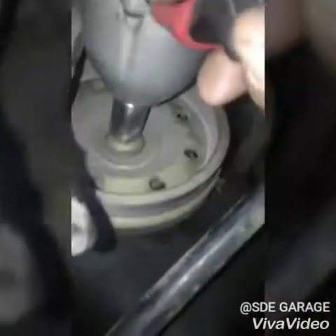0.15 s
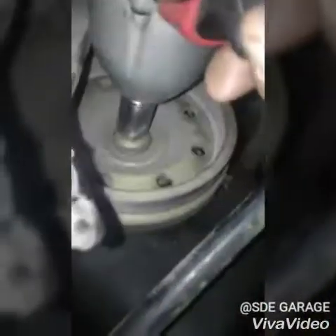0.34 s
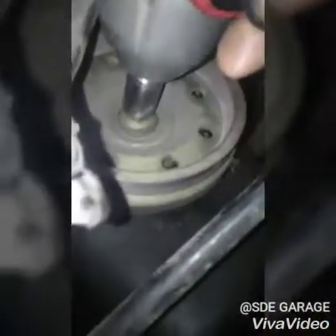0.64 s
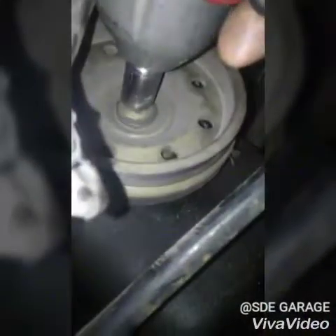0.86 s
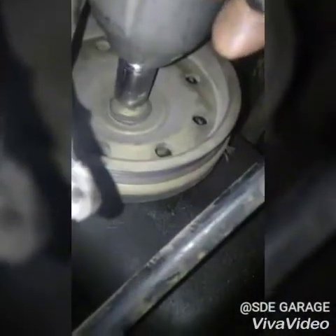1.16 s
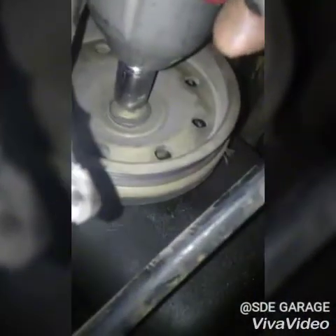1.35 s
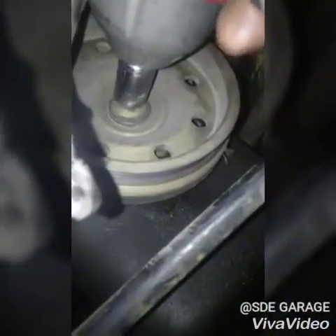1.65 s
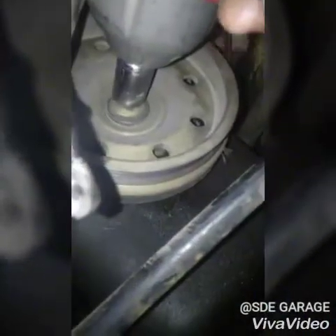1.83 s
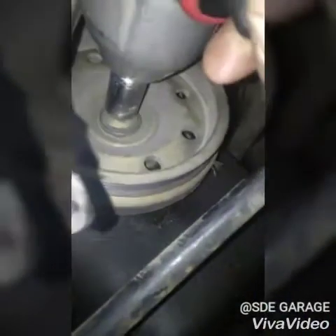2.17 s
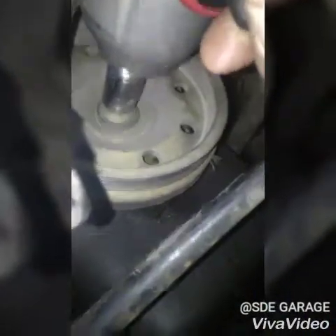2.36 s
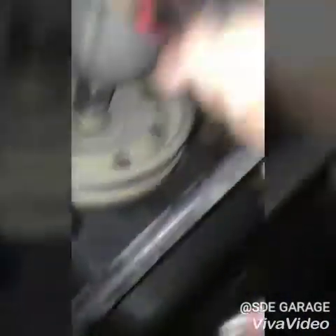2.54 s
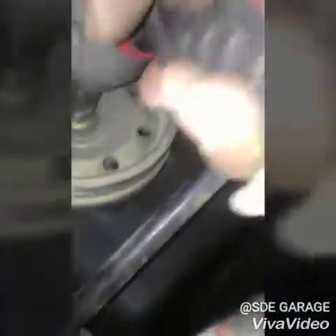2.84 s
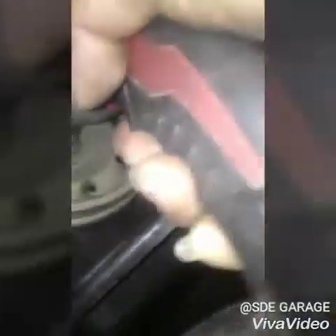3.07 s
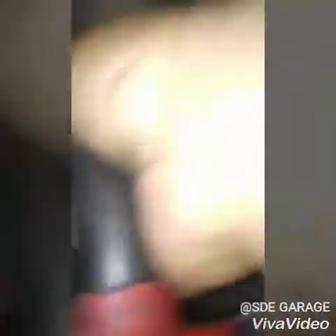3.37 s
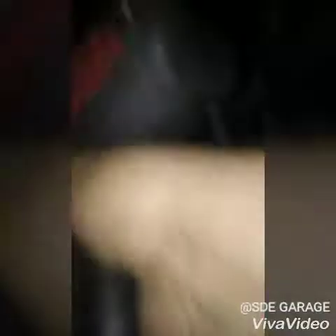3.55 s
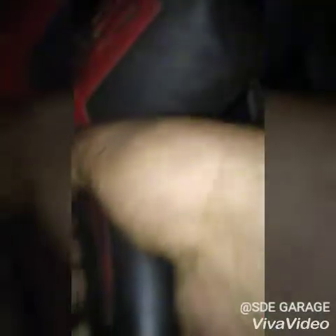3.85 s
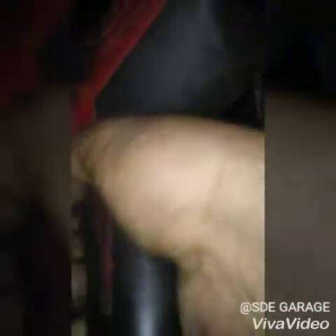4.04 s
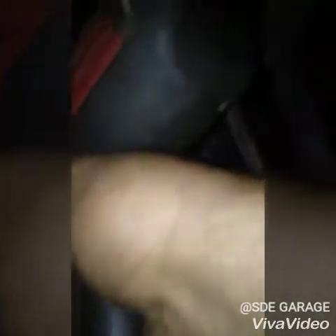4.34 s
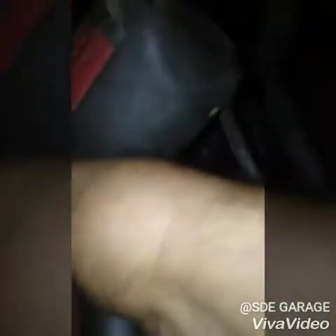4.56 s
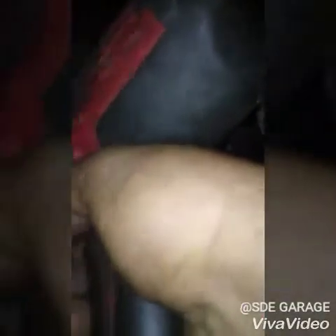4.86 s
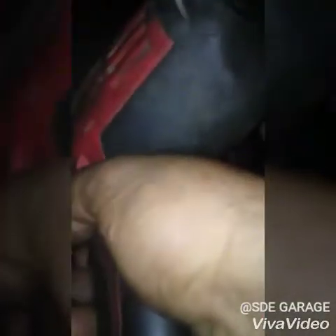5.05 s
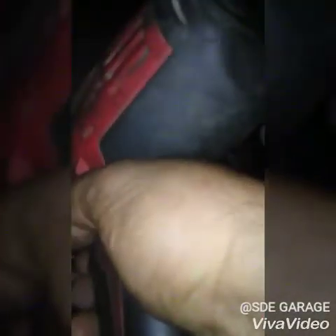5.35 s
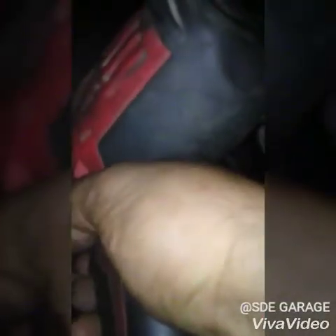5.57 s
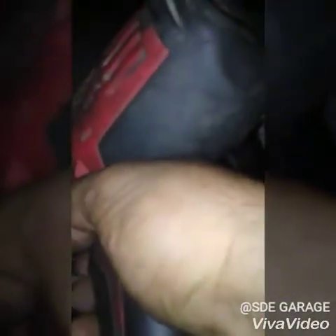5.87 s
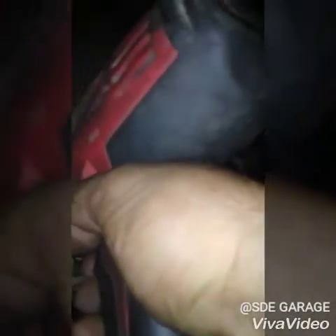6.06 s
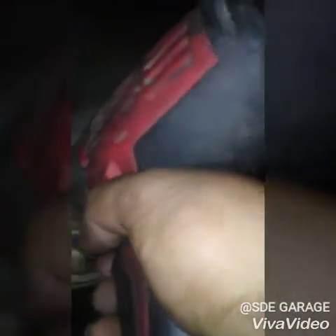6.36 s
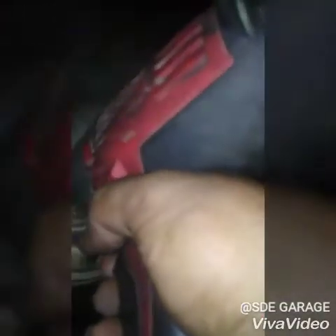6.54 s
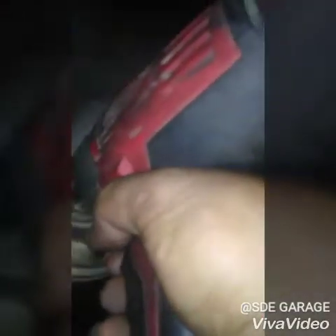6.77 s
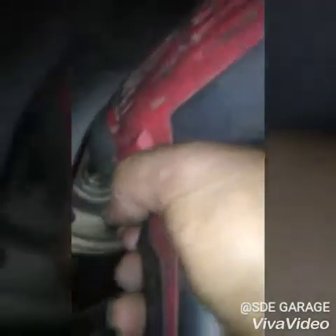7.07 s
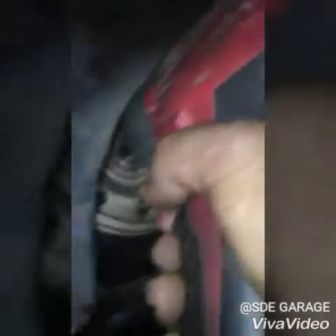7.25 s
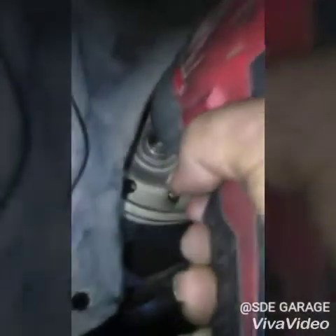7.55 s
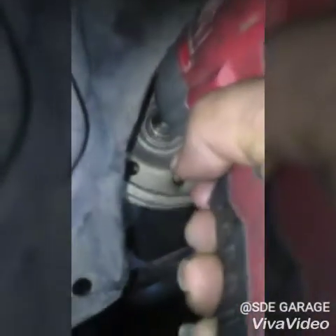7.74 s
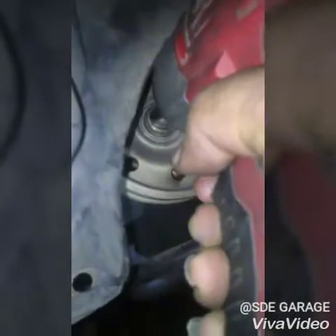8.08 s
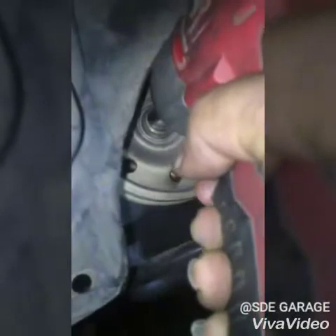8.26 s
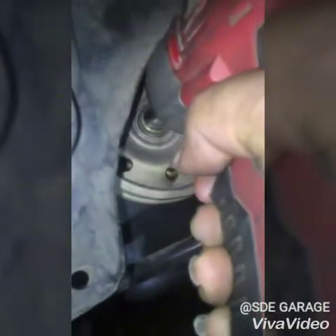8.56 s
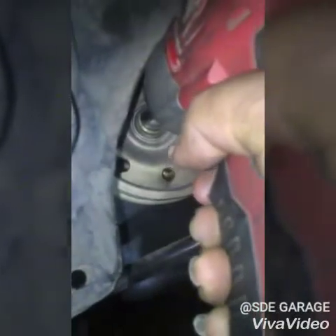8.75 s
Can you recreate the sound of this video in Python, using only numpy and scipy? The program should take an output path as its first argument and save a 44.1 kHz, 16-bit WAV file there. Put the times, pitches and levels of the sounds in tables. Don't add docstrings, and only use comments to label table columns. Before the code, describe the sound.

Hands fumble a power wrench over low rumble, a brief burst of blows rings a metal pulley, then relentless overloaded hammering runs to the end.

```python
import sys
import numpy as np
from scipy import signal
from scipy.fft import rfft, irfft, next_fast_len
from scipy.io import wavfile
from scipy.ndimage import uniform_filter1d

SR = 44100
rng = np.random.default_rng(int(sys.argv[2]) if len(sys.argv) > 2 else 0)


def waveform_to_disk(signal):
    frames = np.transpose(np.atleast_2d(signal))
    scaled = np.clip(frames, -1, 1) * 32767
    samples = np.round(scaled).astype(np.int16)
    wavfile.write(sys.argv[1], SR, samples)


def nominal_scale(level):
    x = np.asarray(level, float) / 20
    return 10 ** x


N = 392931

# frequency in Hz, level in dB per Hz.
RUMBLE_SPECTRUM = [(15, -42.5), (30, -18), (60, -1), (110, 1.5), (160, -3.5), (220, -17), (300, -44.5)]
# frequency in Hz, level in dB per Hz.
HALL_SPECTRUM = [(150, -29), (230, 0.5), (320, 1), (500, -9.5), (800, -2.5), (1100, -15.5), (1600, -33)]
# frequency in Hz, level in dB per Hz.
RUBBING_SPECTRUM = [(400, -24.5), (800, -2), (1400, -3.5), (2300, -2), (3000, -11.5), (4500, -12.5),
                    (5700, -10.5), (6800, -7), (8000, -17.5), (10000, -20.5), (13000, -25.5)]
# time in seconds, peak in dB.
LURCHES = [(.1, -52), (.34, -48), (.82, -47), (.98, -50), (1.5, -53.5), (2.04, -55.5), (2.36, -48),
           (2.53, -46.5), (2.95, -54), (3.22, -48), (3.75, -47.5)]
# time in seconds, peak in dB.
GRIPS = [
    (.12, -57),
    (1.95, -58.5),
    (2.36, -42),
    (2.53, -49),
    (2.73, -54.5),
    (3.1, -58),
    (3.3, -64),
    (3.62, -59),
    (4.13, -54),
]
# time in seconds, peak in dB.
DRONE_SWELLS = [
    (-.01, -49),
    (.33, -39.5),
    (.82, -43),
    (1.08, -48),
    (1.58, -56),
    (2.0, -54),
]
# time in seconds, frequency in Hz.
DRONE_PITCH = [(0.3, 135.3), (0.9, 140.3), (1.3, 140), (1.6, 136.5)]
# start in seconds, end in seconds, frequency in Hz, level in dB.
TRIGGER_WHINE = (1.781, 1.836, 7810, -55)

# start in seconds, length in seconds, frequency in Hz, level in dB.
RUBS = [(.0, .06, 6660, -57), (.001, .066, 2530, -59), (0.088, 0.15, 5400, -55), (.1, .04, 3400, -57),
        (.96, .16, 5600, -69), (1.862, 0.027, 1730, -35.5), (1.97, 0.054, 5700, -58),
        (2.33, .1, 4400, -30.5), (2.443, .057, 4800, -45.5), (2.663, 0.02, 920, -36),
        (2.708, .025, 940, -40), (2.773, .077, 6500, -54), (2.915, .02, 1750, -56), (3.45, .13, 6300, -62),
        (4.05, .07, 5330, -48)]
# start in seconds, length in seconds, frequency in Hz, level in dB.
SCUFFS = [(0.09, 0.13, 3280, -46.5), (0.11, 0.034, 1150, -41), (1.728, .03, 6000, -64),
          (2.445, 0.078, 2390, -36.5), (2.601, 0.17, 5200, -43), (2.62, 0.13, 2300, -45.5),
          (3.04, .04, 5800, -62), (3.077, .073, 6400, -53.5), (3.63, .06, 6000, -56)]
# start in seconds, length in seconds, frequency in Hz, level in dB.
METAL_RINGS = [(.11, .09, 5660, -50), (.29, .13, 5750, -67), (0.957, .019, 4000, -32),
               (0.961, .24, 6900, -71), (1.865, .11, 3700, -63), (2.205, .08, 525, -14),
               (2.285, .09, 490, -29), (2.32, .12, 750, -38), (2.589, .016, 4100, -31),
               (2.7, .2, 3600, -65), (3.345, .08, 3650, -62), (3.36, .66, 2000, -66), (3.4, .38, 3630, -68),
               (3.54, .04, 7000, -62), (3.6, .3, 2450, -68), (4.056, .02, 5760, -30)]

# start in seconds, level of the middle part in dB, then dull part
# and bright part in dB against the middle.
KNOCKS = [(0.121, -41, -8, 1), (.672, -66, -15, 11), (1.539, -67, -1.5, -2.5), (1.733, -51, -16, -6),
          (1.865, -38, -1, 1), (1.935, -61, -6, 10), (2.325, -23, -8, 6), (2.452, -30.5, -10, 1),
          (2.471, -31, -7, 4), (2.676, -46.5, 12.5, 13), (2.72, -52, 5, -1), (2.921, -54, -6, 3),
          (3.214, -51.5, -14, 11), (3.385, -51, -18, 7), (3.478, -52, -5.5, -13), (3.554, -49, -10, -11),
          (3.625, -38.5, -6, 4), (3.986, -41, -19, -9), (4.011, -49, -7, -12), (4.059, -32.5, -11, 16.5),
          (4.08, -29, -2.5, 5)]
# start in seconds, level of the middle part in dB, then dull part
# and bright part in dB against the middle.
SNAPS = [
    (0.144, -28.5, -25, 0),
    (0.959, -19.5, -1.5, 5.7),
    (2.591, -23.5, -10, 8),
    (2.609, -35, -3, -14),
    (2.665, -31, -13, 8.5),
    (3.02, -51, -1, 11),
    (3.031, -40, 4, 2),
]
PART_EDGES_HZ = [650, 1900, 4900, 7300]

# start and release in seconds, then working level of the pulley ring,
# casing rattle and socket rattle in dB.
PULLS = [
    (2.056, 2.223, -16.5, -16.5, -12.5),
    (4.138, 9.5, -22, -14, -10),
]
# time after the first blow in seconds, level in dB.
RING_START = [(0, -11), (.088, 4.5), (.125, -9), (.16, 0), (.6, 0.24)]
# time in seconds, level in dB.
LEAN = [
    (4.4, -0.5),
    (4.75, 2.0),
    (5.0, 0.3),
    (6.9, -0.44),
    (7.6, 0.5),
]
LEAN_SHARE = [.6, 1.1, -.1]
HOLD_S = [.035, .018, .002]
RELEASE_DB_PER_S = [400, 330, 501]
SPIN_FROM_DB, SPIN_TO_DB = [-39, -26, -19], [-27, -11.5, -10.5]
SETTLE_DB, SETTLE_DB_PER_S = [-12, -8.5, -17.5], [140, 100, 98]
REBOUND_DB, REBOUND_FALL_DB_PER_S = [-26, -18, -15], [178, 338, 337.5]
GIVES_DB = [4, 1.5, -2.3]

# time in seconds, rate in blows per second.
BLOW_RATE = [(2.0, 41.0), (4.2, 40.5), (4.5, 40.9), (6.5, 40.8), (7.0, 40.65), (7.6, 40.9), (8.91, 40.75)]
# time in seconds, swell of the rattle in dB.
UNEVEN_BLOWS = [(2.072, 3.5), (2.09, 4), (2.107, 6.5), (2.129, -1), (2.161, 4), (2.187, 0), (2.218, 3.5),
                (2.292, 3.5), (2.322, 1), (4.157, -4)]
# frequency in Hz, level in dB, time to fall 60 dB in seconds.
PULLEY_MODES = [(410, 0, 0.12), (461, -3, 0.12), (489.3, 2.5, 0.11), (523.4, 2, 0.14), (1160, -12, .04),
                (1410, 0.5, .04), (1510, -5, .04), (1780, 2.5, .04)]
# frequency in Hz, level in dB.
SOCKET_MODES = [(1230, -2.5), (1395, 1), (1500, -1.5), (1720, 1.5), (2950, -5.5), (4180, 0), (4480, 2.5),
                (4900, 2), (5250, -1), (5500, 3.5), (5950, 3.5), (6250, -0.5)]
# frequency in Hz, level in dB per Hz.
RATTLE_SPECTRUM = [(18, -46.5), (30, -29), (118, -2), (344, -3.5), (504, 2), (603, -3), (1080, -8),
                   (1390, -3.5), (2150, -5), (2910, -5), (3950, -7), (5360, -2), (6090, -4.5),
                   (9380, -18.5), (13100, -21)]
# frequency in Hz, depth in dB, lag in blows.
BLOW_SWELL = [(100, 2.5, 0.79), (290, 3.5, 0.85), (500, 1, .0), (1400, 0.5, 0.25), (3000, 0.5, .2),
              (6000, 4.1, 0.26)]

FILL_FROM_HZ, FILL_BAND_HZ, CUT_HZ = 4200, 690, 13210


def rms_one(x):
    return x / np.sqrt(np.mean(x ** 2) + 1e-20)


def in_time(rows):
    s, *columns = np.transpose(rows)
    return [np.interp(np.arange(N) / SR, s, c) for c in columns]


def at_hz(points, hz, column=1):
    points = np.array(points)
    return np.interp(np.log(hz), np.log(points[:, 0]), points[:, column])


def drift(rate):
    r = np.exp(-80 * np.pi * rate / SR)
    chance = rng.standard_normal(N // 40 + 2002)
    slow = signal.lfilter([1], [1, -2 * r, r * r], chance)[2000:]
    return np.interp(np.arange(N) / 40, np.arange(len(slow)), rms_one(slow))


def coloured(spectrum):
    size = next_fast_len(N)
    hz = np.maximum(np.fft.rfftfreq(size, 1 / SR), 1)
    noise = rfft(rng.standard_normal(size))
    return rms_one(irfft(noise * nominal_scale(at_hz(spectrum, hz)), size)[:N])


def swells(rows, rest_db, rise_db, fall_db):
    t = np.arange(0, N + 64, 64) / SR
    peaks = [db - np.maximum(rise_db * (s - t), fall_db * (t - s)) for s, db in rows]
    return np.interp(np.arange(N) / SR, t, np.maximum(np.max(peaks, axis=0), rest_db))


def far_engine():
    drone_db = swells(DRONE_SWELLS, -120, rise_db=68, fall_db=58)
    turns = np.cumsum(in_time(DRONE_PITCH)[0]) / SR
    return nominal_scale(drone_db - 1.0 + 1.4 * drift(6.0)) * np.sin(2 * np.pi * turns)


def trigger_whine():
    start, end, hz, db = TRIGGER_WHINE
    t = np.arange(N) / SR
    fade = np.clip(np.minimum(t - start, end - t) / .004, 0, 1)
    return nominal_scale(db) * np.sin(2 * np.pi * hz * t) * fade


def background():
    rumble_rest_db, rub_rest_db = -57.5, -70
    rumble_db = swells(LURCHES, rumble_rest_db, rise_db=38.5, fall_db=36)
    rub_db = swells(GRIPS, rub_rest_db, rise_db=57, fall_db=52)
    hall_db = -66.5 + 0.33 * (rub_db - rub_rest_db) + 0.49 * (rumble_db - rumble_rest_db)
    rumble = nominal_scale(rumble_db + 2.0 + 2.3 * drift(9.0)) * coloured(RUMBLE_SPECTRUM)
    hall = nominal_scale(hall_db) * coloured(HALL_SPECTRUM)
    rubbing = nominal_scale(rub_db - 0.7 + 1.5 * drift(25.0)) * coloured(RUBBING_SPECTRUM)
    return rumble + hall + rubbing + far_engine() + trigger_whine()


def rubs():
    out, t = np.zeros(N), np.arange(SR * 2 // 3) / SR
    kinds = [(SCUFFS, 0.5), (RUBS, .21), (METAL_RINGS, .06)]
    events = [(*row, width) for rows, width in kinds for row in rows]
    grains = rng.standard_normal((len(events), len(t))) * nominal_scale(3.0 * drift(60.0)[:len(t)])
    for (start, length, hz, db, width), grain in zip(events, grains):
        shape = np.abs(np.sin(np.pi * np.clip(t / length, 0, 1) ** .5)) ** 1.3
        edges = [hz * (1 - width / 2), hz * (1 + width / 2)]
        sos = signal.butter(2, edges, "band", fs=SR, output="sos")
        at = max(round(start * SR), 0)
        out[at:at + len(t)] += nominal_scale(db) * shape * rms_one(signal.sosfilt(sos, grain))
    return out


def knocks():
    out, t = np.zeros(N), np.arange(4000) / SR
    snap_t60_s, knock_t60_s = 0.0096, 0.043
    events = [(*row, snap_t60_s) for row in SNAPS] + [(*row, knock_t60_s) for row in KNOCKS]
    chance = rng.standard_normal((len(events), len(t)))
    bands = zip(PART_EDGES_HZ, PART_EDGES_HZ[1:])
    passes = [signal.butter(2, edge, "band", fs=SR, output="sos") for edge in bands]
    click = 2.1 * np.exp(-((t - .0003) / .00002) ** 2)
    for (s, peak_db, dull_db, bright_db, t60), noise in zip(events, chance):
        crunch = noise * nominal_scale(-60 * t / t60) * np.minimum(t / (0.019 * t60), 1)
        crunch += click * min(0.012 / t60, 1)
        parts = [signal.sosfilt(sos, crunch) for sos in passes]
        dull, middle, bright = [p / np.sqrt(np.sum(p ** 2)) for p in parts]
        sound = nominal_scale(dull_db + 7.5) * dull - middle + nominal_scale(bright_db) * bright
        at = round(s * SR)
        out[at:at + len(t)] += nominal_scale(peak_db + 17) * sound
    return out


def garage(x):
    t = np.arange(SR // 2) / SR
    t60_s, level_db = 0.46, -29.5
    tail = rng.standard_normal(len(t)) * nominal_scale(-60 * t / t60_s) * (t > .006)
    tail = signal.lfilter([.5], [1, -.5], tail)
    return nominal_scale(level_db) * signal.fftconvolve(x, tail / np.sqrt(np.sum(tail ** 2)))[:N]


def column(values):
    return np.array(values, float)[:, None]


def effort():
    t = np.arange(N) / SR
    spin_up_s, rebound_s, gives_s, gives_over_s = .0185, 2.296, 8.45, 0.32
    rebound_fall = column(REBOUND_FALL_DB_PER_S) * (t - rebound_s)
    level_db = column(REBOUND_DB) - np.maximum(1100 * (rebound_s - t), rebound_fall)
    steps_db = 0.5 * drift(25.0)
    for start, release, *work_db in PULLS:
        since = t - start - spin_up_s
        after = np.maximum(t - release, 0)
        take_up = np.interp(since, *np.transpose(RING_START))
        casing_wakes = -4.5 * np.exp(-np.maximum(since, 0) / 0.15)
        blows = np.array([take_up, casing_wakes, -.2 * take_up * (since > .05)])
        dying = -column(RELEASE_DB_PER_S) * np.maximum(after - column(HOLD_S), 0)
        settling = column(SETTLE_DB) - column(SETTLE_DB_PER_S) * after + steps_db
        blows += np.maximum(dying, settling)
        spin = column(SPIN_TO_DB) + (column(SPIN_TO_DB) - column(SPIN_FROM_DB)) * since / spin_up_s
        before_pull = 8000 * np.maximum(start + .002 - t, 0)
        pull_db = column(work_db) + np.where(since < 0, spin, blows) - before_pull
        level_db = np.maximum(level_db, pull_db)
    level_db = level_db + column(LEAN_SHARE) * in_time(LEAN)[0]
    level_db = level_db + column(GIVES_DB) * np.clip((t - gives_s) / gives_over_s, 0, 1)
    return np.maximum(level_db, -120)


def ring(clicks, hz, t60):
    r, w = nominal_scale(-60 / (t60 * SR)), 2 * np.pi * hz / SR
    return signal.lfilter([0, np.sin(w)], [1, -2 * r * np.cos(w), r * r], clicks + 1e-18)


def pulley(turns):
    blows = np.diff(np.floor(turns), prepend=0)
    return rms_one(sum(nominal_scale(db) * ring(blows * nominal_scale(1.5 * drift(5.3)), hz, t60) for hz, db, t60 in PULLEY_MODES))


def socket():
    contacts = rng.standard_normal(N)
    return rms_one(sum(nominal_scale(db + 3.8 * drift(12.0)) * ring(contacts, hz, .022) for hz, db in SOCKET_MODES))


def uneven_blows():
    swell_db = np.zeros(N)
    for s, db in UNEVEN_BLOWS:
        since = np.arange(N) / SR - s
        swell_db += db * np.exp(-np.maximum(since, 0) / 0.0066) * np.clip(since / .003 + 1, 0, 1)
    return swell_db


def rattle(turns, ring_db, casing_db, socket_db):
    out, size, swell_db = np.zeros(N), next_fast_len(N), uneven_blows()
    whole, shared = rfft(coloured(RATTLE_SPECTRUM), size), drift(4.5)
    hz = np.fft.rfftfreq(size, 1 / SR)
    edges = np.r_[25, 70, 150, 250 * 2 ** (np.arange(26) / 4)]
    for low, high in zip(edges, edges[1:]):
        band = irfft(whole * (hz >= low) * (hz < high), size)[:N]
        mid = np.sqrt(low * high)
        bright = np.clip(np.log2(mid / 1500) / 1.9, 0, 1)
        dull = np.clip(np.log2(900 / mid), 0, 1) * min(mid / 450, 1)
        metal_db = (1 - bright) * (casing_db + 7.0) + bright * (socket_db + 5.5)
        level_db = (1 - dull) * metal_db + dull * (ring_db + 9.0)
        air_db = (mid > 7200) * (0.26 * (socket_db + 5.5) + .7 * np.minimum(socket_db + 8.5, 0))
        beat = np.cos(2 * np.pi * (turns - at_hz(BLOW_SWELL, mid, column=2)))
        beat_db = at_hz(BLOW_SWELL, mid) * beat
        chance_db = 0.16 * shared + 1.21 * drift(22.0)
        out += band * nominal_scale(level_db + swell_db + air_db - 0.81 + beat_db + chance_db)
    return out


def wrench():
    ring_db, casing_db, socket_db = effort()
    turns = np.cumsum(in_time(BLOW_RATE)[0] * (1 + .003 * drift(2.5))) / SR
    out = nominal_scale(ring_db - 2.0) * pulley(turns)
    out += nominal_scale(socket_db - 2.5) * socket()
    return out + rattle(turns, ring_db, casing_db, socket_db)


def scene():
    fall = signal.butter(4, 7600, fs=SR, output="sos")
    hits = signal.sosfilt(fall, knocks() + rubs())
    hits += nominal_scale(-12.5) * np.diff(hits, prepend=0)
    return np.tile(wrench() + hits + garage(hits) + background(), (2, 1))


def noise_fill(x, steady_db):
    window = np.sin(np.pi * (np.arange(2048) + .5) / 2048)
    hz, _, frames = signal.stft(x, SR, window=window, nperseg=2048)
    _, _, fill = signal.stft(rng.standard_normal(x.shape), SR, window=window, nperseg=2048)
    treble_db = 10 * np.log10(np.mean(abs(frames[0, hz > FILL_FROM_HZ]) ** 2, axis=0) + 1e-20)
    jump_db = abs(np.diff(treble_db, prepend=0)) + abs(np.diff(treble_db, append=0))
    steady = (jump_db < steady_db) & (rng.random(len(jump_db)) < .8)
    for low in np.arange(FILL_FROM_HZ, CUT_HZ, FILL_BAND_HZ):
        band = (hz >= low) & (hz < low + FILL_BAND_HZ)
        power, fill_power = [np.mean(abs(z[:, band]) ** 2, axis=1, keepdims=True) for z in (frames, fill)]
        noisy = np.max(abs(frames[0, band]) ** 2, axis=0) < 9 * power[0, 0]
        swap = steady & noisy & (rng.random(len(steady)) < .9)
        matched = fill[:, band] * np.sqrt(power / fill_power)
        frames[:, band] = np.where(swap, matched, frames[:, band])
    return signal.istft(frames, SR, window=window, nperseg=2048)[1][:, :N]


def top_band(x, top_db):
    hz, _, frames = signal.stft(x, SR, nperseg=1024)
    _, _, hiss = signal.stft(rng.standard_normal(x.shape), SR, nperseg=1024)
    level_db = 10 * np.log10(np.mean(abs(frames[0]) ** 2, axis=0) + 1e-20)
    loud = level_db > np.max(level_db) - 6
    on = loud & (uniform_filter1d(rng.standard_normal(len(level_db)), size=5) > -.25)
    frames = np.where((hz < CUT_HZ)[:, None], frames, hiss * nominal_scale(top_db) * on)
    return signal.istft(frames, SR, nperseg=1024)[1][:, :N]


def top_cut(x):
    return signal.sosfilt(signal.butter(12, 15800, fs=SR, output="sos"), x)


def record(dry):
    overloaded = 1.556 * np.tanh(dry / 1.55)
    clipped = np.clip(noise_fill(overloaded, steady_db=8.5), -1, 1)
    return top_cut(top_band(clipped, top_db=-30.5))


dry = scene()
out = record(dry)
waveform_to_disk(out)
```